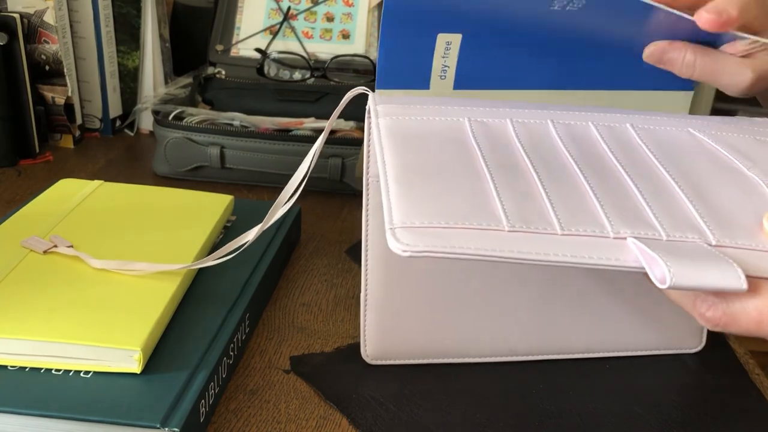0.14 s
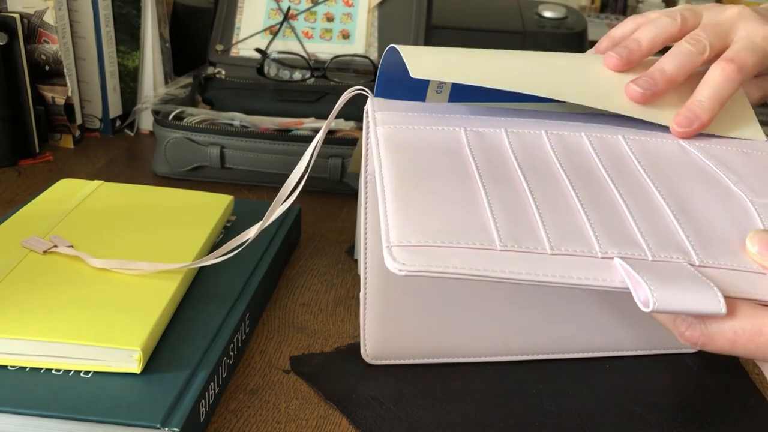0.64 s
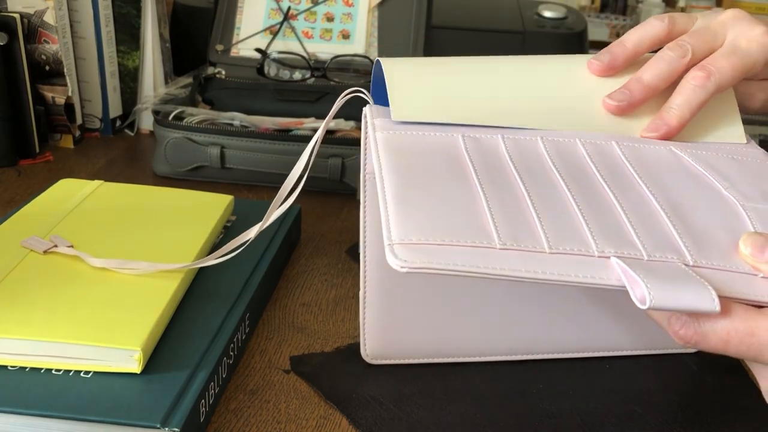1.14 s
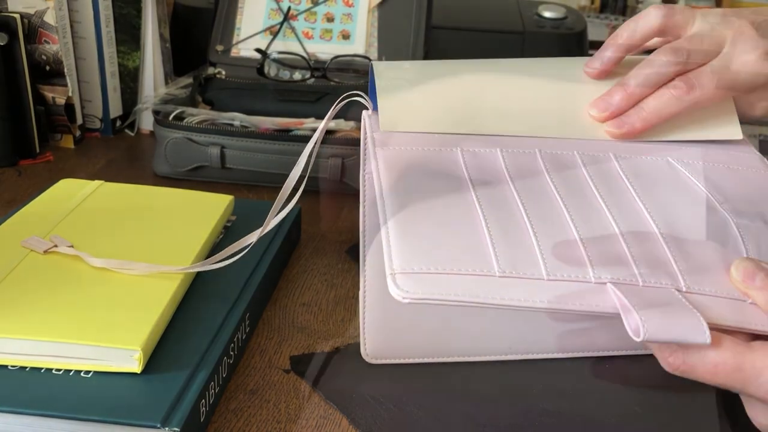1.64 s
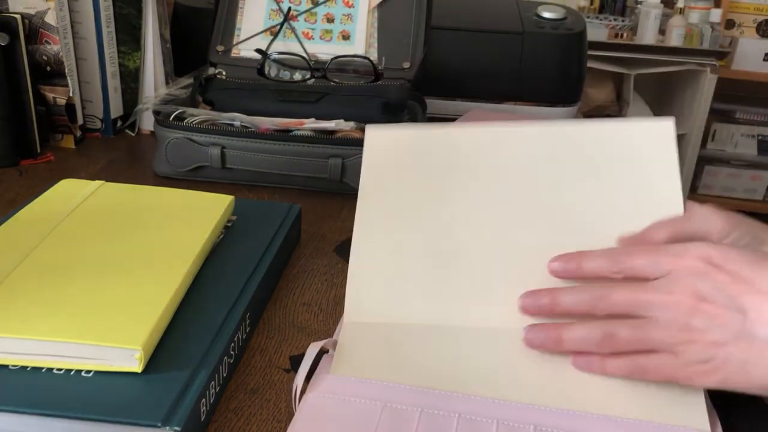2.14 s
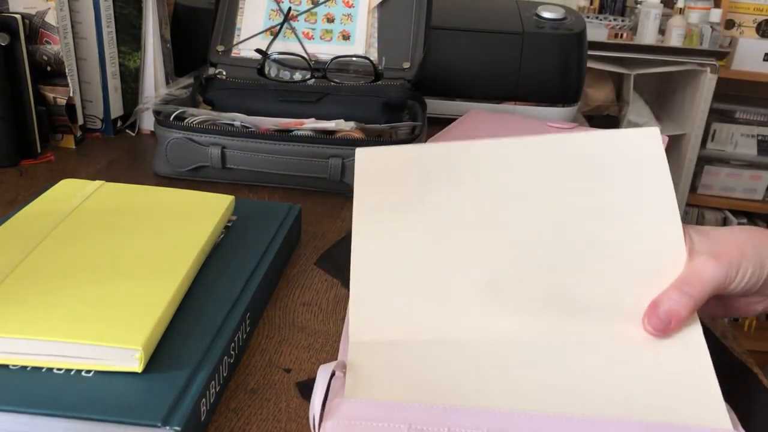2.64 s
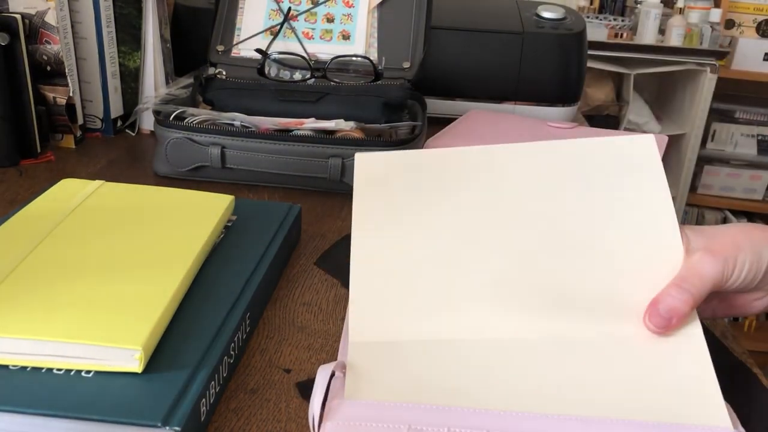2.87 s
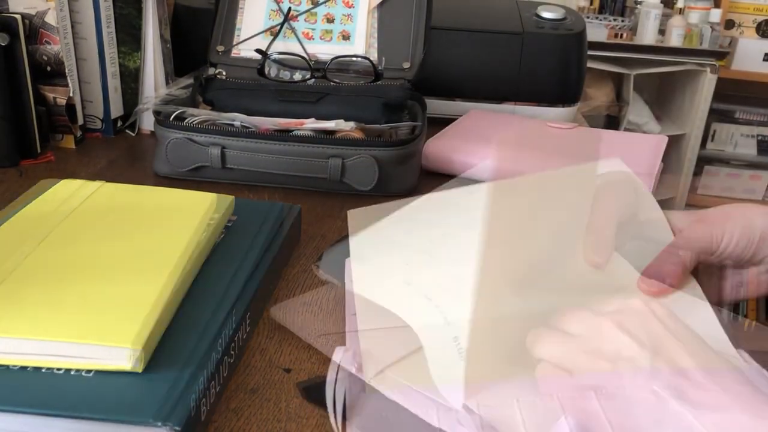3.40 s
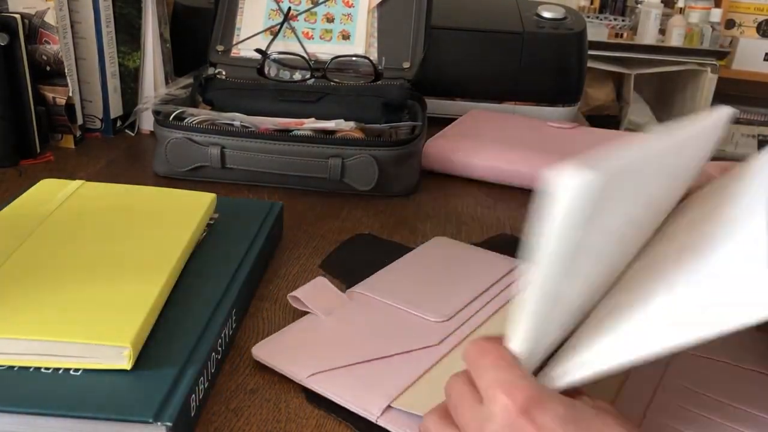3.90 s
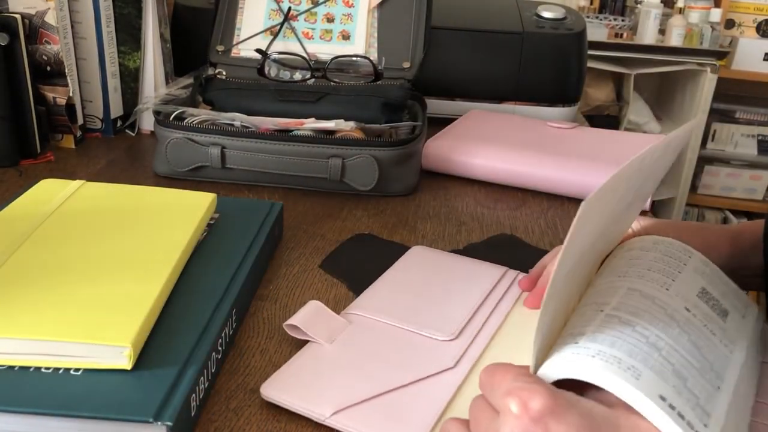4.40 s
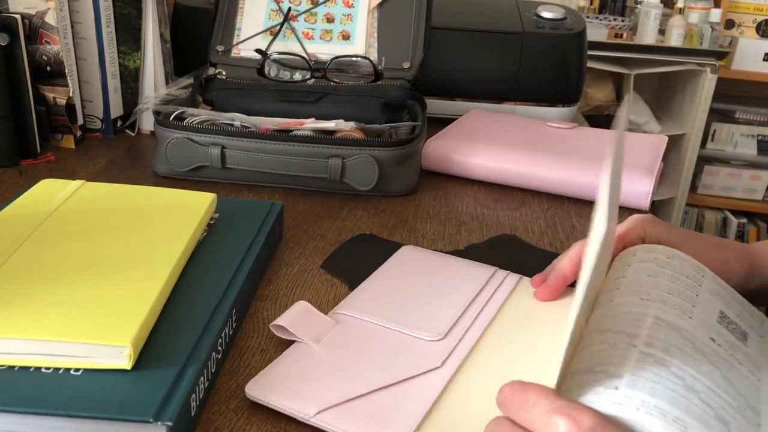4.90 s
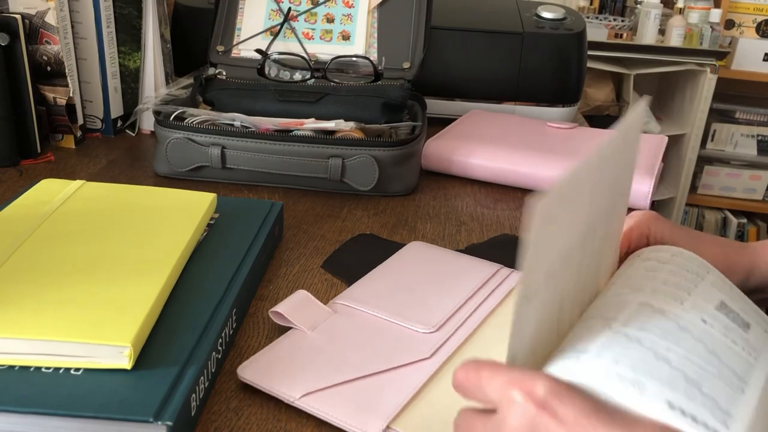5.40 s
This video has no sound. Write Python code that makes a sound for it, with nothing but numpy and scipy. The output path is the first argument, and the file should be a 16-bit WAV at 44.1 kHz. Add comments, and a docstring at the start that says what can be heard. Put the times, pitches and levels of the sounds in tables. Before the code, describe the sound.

Paper sheets and a soft plastic notebook cover rustle and scrape at a desk, with crisp creases, hollow pops and small bumps.

```python
"""Sheets rub and hiss as a notebook's card cover slides into the pocket of a soft plastic folder.
Stick-slip noise excites desk, pocket and paper; creases snap as damped bursts; trapped air pops as
gliding, dying sines with a rattle; the folder bumps the wooden desk as a falling front and ringing modes.
Rubs sing briefly on one resonance and wide sheets fan low air at the microphone of a close phone.
A small furnished room answers with decaying noise, over a faint hum of air made of filtered noise."""
import sys
import numpy as np
from scipy import signal
from scipy.fft import rfft, irfft, next_fast_len
from scipy.io import wavfile
from scipy.ndimage import uniform_filter1d, map_coordinates

SR = 44100
rng = np.random.default_rng(int(sys.argv[2]) if len(sys.argv) > 2 else 0)


def wav_out(sig):
    """Save sig, one row per channel (or a flat mono array), as 16-bit PCM at SR to the path in sys.argv[1]."""
    wavfile.write(sys.argv[1], SR, np.round(np.clip(np.atleast_2d(sig).T, -1, 1) * 32767).astype(np.int16))


def volts(x):
    """Linear amplitude factor 10**(x/20) for a level x in dB, scalar or array-like."""
    e = np.asarray(x, float) / 20
    return 10 ** e


N = 243557

# mean rubbing, before hand and strokes: (time [s], drag on the desk [dB], card in the pocket [dB])
RUBBING_LEVELS = [(0.0, -60, -64.5), (0.28, -63, -64.5), (0.49, -64, -65.5), (0.81, -62.5, -63),
                  (1.25, -63, -63.5), (1.42, -66, -62.5), (1.66, -67, -62), (1.695, -73, -43),
                  (1.76, -72, -63.5), (1.99, -61, -62.5), (2.1, -61, -63.5), (2.35, -61.5, -67),
                  (2.61, -60, -64.5), (3.01, -56.5, -62), (3.15, -61, -68.5), (3.3, -68, -70),
                  (3.42, -63, -66.5), (3.78, -62.5, -65), (4.0, -59.5, -66.5), (4.29, -64, -59),
                  (4.67, -58, -70), (4.92, -59.5, -61), (5.16, -59, -65.5), (5.52, -69, -67.5)]
# sheets resting and creeping on each other between strokes: (time [s], scrape level [dB])
CREEP_LEVELS = [(0.0, -80), (0.26, -75.5), (0.32, -69.5), (0.75, -67), (0.88, -75.5), (1.05, -69),
                (1.25, -65.5), (1.41, -73.5), (1.8, -69.5), (2.0, -81), (2.55, -65.5), (2.76, -76.5),
                (3.2, -65.5), (3.4, -93), (3.6, -71), (4.2, -70), (4.65, -68), (5.25, -75.5), (5.52, -58)]
# strokes of sheet on sheet: (peak time [s], rise [s], fall [s], coarse scrape [dB], fine fizz [dB])
SHEET_STROKES = [(0.0, 0.032, 0.14, -65, -90), (0.506, 0.0054, 0.054, -62, -62.5),
                 (0.814, 0.02, 0.061, -63, -70), (0.925, 0.012, 0.13, -60, -69),
                 (1.3, 0.097, 0.1, -65.5, -63.5), (1.463, 0.032, 0.075, -62, -72),
                 (1.565, 0.018, 0.046, -57.5, -64), (1.604, 0.022, 0.032, -45.5, -54),
                 (1.93, 0.061, 0.086, -66, -73), (2.042, 0.047, 0.17, -61, -68.5),
                 (2.155, 0.004, 0.096, -60.5, -70), (2.283, 0.064, 0.1, -59, -67),
                 (2.35, 0.11, 0.16, -66.5, -60.5), (2.822, .003, 0.031, -55, -58),
                 (2.851, 0.032, 0.014, -61, -52.5), (2.955, 0.028, 0.091, -66.5, -62),
                 (3.055, 0.049, 0.034, -58, -54.5), (3.112, 0.047, 0.03, -52.5, -63),
                 (3.264, 0.016, 0.057, -55.5, -58), (3.329, 0.069, 0.044, -56.5, -67),
                 (3.488, 0.17, 0.27, -64.5, -70.5), (3.656, 0.039, 0.053, -60, -64),
                 (3.705, 0.026, 0.083, -65.5, -60), (3.803, 0.09, 0.14, -63.5, -59),
                 (4.02, 0.12, 0.045, -59, -72), (4.075, 0.044, 0.076, -59.5, -61),
                 (4.129, 0.051, 0.13, -57, -58), (4.278, 0.079, 0.072, -66.5, -68),
                 (4.381, 0.04, 0.035, -59.5, -56), (4.538, 0.0094, 0.049, -43.5, -50),
                 (4.77, 0.044, 0.35, -62, -63), (4.869, 0.17, 0.11, -63, -58.5),
                 (5.43, 0.035, 0.24, -60.5, -61), (5.52, 0.16, 0.29, -63, -52)]
# resonances of the rubbed desk: (frequency [Hz], width [Hz], level [dB])
DRAG_RESONANCES = [(102, 49, -4), (189, 12.2, 5), (275, 48, -1), (331.6, 20.7, 2.5), (404, 120, -6.5)]
# resonances of the hollow pocket: (frequency [Hz], width [Hz], level [dB])
POCKET_RESONANCES = [(538, 137, 3.5), (840, 272, 7), (1100, 410, 6.5), (1680, 690, -12)]
# relative spectrum of rubbed paper: (frequency [Hz], density [dB per Hz])
PAPER_SPECTRUM = [(880, -35), (1500, 4), (2630, 2), (3810, 0.5), (6620, 0), (7850, -1.5), (14800, -8.5),
                  (16000, -7), (16500, -68)]
# creases snapping, before radiation: (time [s], peak [dB], centre [Hz], edge relative to body [dB])
CREASE_SNAPS = [(0.297, -42, 4570, -5), (0.626, -43.5, 3400, -15), (1.342, -43, 4500, -8),
                (1.4562, -39.5, 2940, 0.5), (1.593, -35, 6200, -17), (1.6024, -21.5, 5400, -17),
                (2.0148, -39, 4620, -3), (2.1537, -49, 4430, -5), (2.187, -37, 2530, 4),
                (2.274, -28.5, 8000, -3.5), (2.28, -36, 2770, 0), (2.443, -27, 5970, -34),
                (2.5252, -36, 2000, -10), (2.82, -31, 4800, -6), (2.92, -40, 5850, -27),
                (2.947, -45, 5030, -12), (2.96, -36, 6100, -22), (2.9629, -27, 7000, -26),
                (2.9679, -33.5, 6600, -30), (3.023, -41.5, 2590, -10), (3.07, -36, 2520, -12),
                (3.102, -28.5, 5730, -2), (3.108, -32.5, 5450, -24), (3.254, -15, 4900, -36),
                (3.3147, -27, 3560, -11), (3.46, -33, 3140, -11), (3.473, -35, 3130, -21),
                (3.493, -34.5, 2840, -24), (3.5258, -43, 5000, -11), (3.55, -34, 4160, -7.5),
                (3.629, -35.5, 5630, -2.5), (3.6416, -36, 5800, -13), (3.648, -37, 3500, -2),
                (3.658, -43, 4500, -14), (3.732, -42, 4500, -15), (3.956, -40, 2440, -31),
                (3.986, -32, 2400, -14), (4.015, -31.5, 4820, -11), (4.257, -36, 3200, -7),
                (4.289, -39.5, 5700, -31), (4.296, -43, 7300, -16), (4.348, -45, 7500, -10),
                (4.371, -41, 8500, -8), (4.3775, -41, 7000, -15), (4.386, -36, 8500, -10),
                (4.3905, -42, 7000, -13), (4.4462, -38, 3180, -18), (4.456, -41, 6530, -3),
                (4.533, -23.5, 6340, -20), (4.616, -36.5, 2880, -7), (4.815, -28.5, 3520, -1.5),
                (4.96, -33, 2950, 1), (4.9925, -41.5, 4680, -42), (5.0536, -41, 4940, -25),
                (5.3937, -35, 5200, -0.5), (5.45, -33, 4140, -20), (5.515, -31, 3000, -14)]
# the pocket popping, before radiation: (time [s], peak [dB], air resonance [Hz])
POCKET_POPS = [(0.454, -47.5, 810), (0.599, -41, 820), (0.624, -45, 740), (1.01, -51, 770),
               (1.141, -46.5, 1210), (1.239, -45, 1170), (1.2455, -38.5, 1040), (1.342, -45, 1150),
               (1.455, -37.5, 1240), (1.561, -46, 1100), (1.593, -32, 1020), (1.602, -21, 1680),
               (1.603, -18, 1077), (1.684, -39, 1050), (1.793, -44, 1030), (2.015, -38.5, 944),
               (2.116, -44.5, 900), (2.154, -43, 1250), (2.19, -39, 890), (2.195, -43, 1250),
               (2.274, -40, 960), (2.2945, -43, 960), (2.355, -39.5, 1150), (2.363, -45, 1010),
               (2.372, -40, 1100), (2.435, -37.5, 840), (2.444, -28.5, 807), (2.5255, -38, 1500),
               (2.962, -44, 1170), (3.101, -36.5, 1080), (3.255, -38.5, 1440), (3.314, -47, 1030),
               (3.375, -45, 1230), (3.461, -46, 1290), (3.546, -44, 790), (3.621, -41, 1250),
               (3.956, -43, 800), (3.982, -41.5, 850), (4.014, -34.5, 964), (4.087, -42, 900),
               (4.135, -42.5, 930), (4.256, -41, 1100), (4.445, -35.5, 900), (4.532, -31, 1834),
               (4.533, -16, 874), (4.961, -42, 1080), (4.994, -40, 840), (5.032, -42, 933),
               (5.055, -41.5, 800), (5.064, -43.5, 840), (5.452, -42, 900), (5.473, -43, 720),
               (5.516, -41, 1560)]
# bumps on the desk: (time [s], peak of the front [dB], softness [ms], thud [Hz])
DESK_BUMPS = [(.318, -58, 1.7, 197), (.746, -52.5, 1.4, 198), (1.247, -48.5, .6, 410),
              (1.457, -40, 1.9, 236), (1.602, -36.5, 0.55, 330), (2.016, -43, 0.72, 434),
              (2.111, -51, 2.2, 310), (2.295, -36.5, 0.95, 310), (2.306, -44, 1, 280),
              (2.355, -44, 0.72, 397), (2.4357, -33, 1, 293), (2.445, -30.5, 0.28, 320),
              (2.526, -33, 2.1, 304), (2.824, -40.5, 3.3, 280), (2.831, -41.5, 4, 160),
              (2.856, -40, 0.85, 345), (3.096, -42, 9.5, 216), (4.014, -46, 0.75, 310),
              (4.532, -46, 2, 295), (4.553, -40, 0.83, 300), (4.72, -47, 1.1, 307), (4.831, -46.5, .5, 423),
              (5.47, -47.5, 0.4, 358)]
# mean modes of the struck desk: (frequency [Hz], relative level [dB], nominal t60 [s])
DESK_MODES = [(111, -3.5, 0.13), (171.7, 9, 0.075), (205.2, 7, 0.14), (280, 17.5, 0.016), (347, 6.5, 0.086),
              (466, 7.5, 0.088), (538, 3.5, 0.2), (820, 1, 0.099)]
# rubs that sing: (middle time [s], length [s], mean rms level [dB], frequency [Hz], pitch spread [Hz])
SINGING_RUBS = [(1.098, 0.24, -69, 2040, 190), (2.934, 0.2, -59, 335, 6.7), (3.606, 0.16, -65, 339, 11.3),
                (4.31, 0.17, -61.5, 337, 14.6), (4.922, 0.32, -58.5, 333.7, 12)]
# wide sheets fanning air at the microphone: (time [s], peak [dB], frequency [Hz])
SHEET_FANS = [(2.86, -71, 52), (3.099, -49, 55), (4.542, -53, 62)]
# reverberation of the room: (frequency [Hz], t60 [s])
ROOM_DECAY = [(150, 0.46), (1000, 0.24), (4000, 0.17), (12000, 0.15)]
# relative spectrum of ventilation and hiss: (frequency [Hz], density [dB per Hz])
AIR_SPECTRUM = [(15, -65), (25, 6), (80, -1), (182, 11.5), (238, 2.5), (304, 6), (617, -15), (952, -13),
                (1830, -21), (3810, -39), (4360, -26), (14800, -67), (16500, -86)]

CREEP_FIZZ_DB = -8  # fine fizz of the creep, relative to its scrape
STROKE_FADE_DB = 20  # lost over one rise or one fall
CARD_FOLLOWS, DRAG_FOLLOWS = 0.7, 0.23  # power of the scrape's gain that also swells card and drag
POP_T60_S = 0.016  # decay of a pop's main resonance
RATTLE_DB, RATTLE_T60_S = -20.5, 0.18  # the card rattles on: peak relative to the pop, decay
SMALL_POP_DB, SMALL_POP_HZ = 5, 1050  # chance pops: greatest peak over capped card level, central pitch
FRONT_HZ, FRONT_S, FRONT_T60_S = 900, 0.00097, 0.025  # front: initial excess pitch, glide time, decay
RING_DB = -4.5  # peak of the desk's ring relative to the front
AIR_DB = -67  # rms level of the air at the microphone


def rubbing():
    """Stick-slip friction: grit excites desk, pocket and sheet; one unsteady hand shakes all three."""
    drag_db, card_db = curves(RUBBING_LEVELS)
    scrape_gain, fizz_gain = sliding()
    hand_db = 1.97 * wobble(45)
    drag = unit(filtered(gritty(grit_db=-0.5), resonant(DRAG_RESONANCES)))
    card = unit(filtered(gritty(grit_db=5.0), resonant(POCKET_RESONANCES)))

    contact = patchy(gritty(grit_db=2.5), patchy_db=2.5)
    sheet = filtered(contact, lambda hz: volts(along(PAPER_SPECTRUM, hz)))
    fizz = filtered(sheet, lambda hz: 1 / (1 + (6500 / (hz + 1)) ** 4))  # the part above 6.5 kHz
    scrape = unit(sheet - fizz) + 0.6 * crackle(count=2200)
    hiss = fizz_gain * unit(fizz) + scrape_gain * scrape

    stroke = scrape_gain / np.median(scrape_gain)
    drag = drag * stroke ** DRAG_FOLLOWS
    card = card * stroke ** CARD_FOLLOWS
    drag_gain = volts(drag_db + 0.68 * hand_db + 2.15 * wobble(20))
    card_gain = volts(card_db + hand_db + 2.3 * wobble(23.795))
    return drag_gain * drag + card_gain * card + volts(0.31 * hand_db) * hiss


def sliding():
    """Power addition: scrape and fizz gains sum a creeping bed and strokes that swell and fade evenly in dB."""
    creep_db, = curves(CREEP_LEVELS)
    t = np.arange(N) / SR
    power = volts([creep_db, creep_db + CREEP_FIZZ_DB]) ** 2
    for s, rise, fall, *levels_db in SHEET_STROKES:
        shape_db = -STROKE_FADE_DB * np.maximum((s - t) / rise, (t - s) / fall)
        power = power + volts(np.add.outer(levels_db, shape_db)) ** 2
    return np.sqrt(power)


def gritty(grit_db):
    """Stick-slip noise: white noise of rms 1 whose slips differ in size."""
    slips = unit(uniform_filter1d(rng.standard_normal(N), size=24))
    return unit(rng.standard_normal(N) * volts(grit_db * np.clip(slips, -3, 2)))


def patchy(x, patchy_db):
    """Distributed contact: different parts of the sheet touch in turn, so the colour shifts in patches."""
    z = signal.stft(x, nperseg=256)[2]
    field = uniform_filter1d(rng.standard_normal(z.shape), size=12, axis=0)  # smooth over frequency
    field = uniform_filter1d(field, size=10, axis=1)  # smooth over time
    return signal.istft(z * volts(patchy_db * unit(field)), nperseg=256)[1][:N]


def crackle(count):
    """Impulsive noise: tiny creases as short damped grains of random pitch, a few much larger; rms 1."""
    place, pitch, size = rng.random((count, 3)).T
    t = np.arange(SR // 300) / SR
    hz = (1500 * 6 ** pitch)[:, None]
    gain = volts(-3.9 * np.log(size + 0.01))[:, None]
    grains = gain * ring(t, hz, 6 / hz)
    at = (place * N).astype(int)[:, None] + np.arange(len(t))
    return unit(np.bincount(at.ravel(), grains.ravel(), N)[:N])


def singing():
    """Frictional lock-in: a rub holds one resonance, a tone of shivering pitch that swells in and out."""
    t = np.arange(N) / SR
    out = np.zeros(N)
    for s, length, db, hz, width in SINGING_RUBS:
        swell = np.exp(-(2 * (t - s) / length) ** 4)
        level = volts(db + 2.5 * wobble(30))
        cycles = np.cumsum(hz + width * wobble(2 * width)) / SR
        out += level * swell * np.sqrt(2) * np.sin(2 * np.pi * cycles)
    return out


def snaps():
    """Buckling: a crease flips in a few quick jerks, a broad thwack of stiff sheet with a sharp edge."""
    out, t = np.zeros(N + SR), np.arange(SR // 50) / SR
    for s, db, hz, edge_db in CREASE_SNAPS:
        jerks = rng.standard_normal(len(t)) * volts(-60 * t / 0.0065)
        jerks[0] = 4  # the first flip, set strong
        sheet = ring(t[:SR // 400], hz, 3.94 / hz)  # heavily damped: 60 dB in 3.94 cycles
        body = np.convolve(jerks, sheet)[:len(t)]
        edge = np.diff(jerks, prepend=0)
        add(out, s, unit(body) + volts(edge_db) * unit(edge), db)
    return out[:N]


def pops():
    """Cavity resonance with dispersion: expelled air rings, high bend first, and the card rattles on."""
    out, t = np.zeros(N + SR), np.arange(SR // 10) / SR
    for s, db, hz in [*POCKET_POPS, *small_pops(count=40)]:
        bent = t + 0.00064 * (1 - np.exp(-t / 0.00054))  # time runs fast at first: a falling pitch
        low = volts(rng.normal(-1.5, 2.1)) * ring(bent, 0.567 * hz, 0.62 * POP_T60_S)
        high = 0.074 * ring(bent, 1.9 * hz, 1.5 * POP_T60_S)
        pushed_air = ring(bent, hz, POP_T60_S) + low + high
        add(out, s, pushed_air * (1 - np.exp(-t / 0.0013)), db)

        shakes = rng.standard_normal(len(t)) ** 3  # cubing makes them sparse
        shakes = shakes * volts(-60 * t / RATTLE_T60_S) * (1 - np.exp(-t / 0.008))
        rattle = np.convolve(shakes, ring(t[:SR // 200], hz, 2.5 / hz))[:len(t)]
        add(out, s, rattle, db + RATTLE_DB)
    return out[:N]


def small_pops(count):
    """Random excitation: rows of chance pops whose peaks follow the push on the card up to a cap."""
    place, size, pitch = rng.random((count, 3)).T
    card_db = curves(RUBBING_LEVELS)[1][(place * N).astype(int)]
    peak_db = np.minimum(card_db, -60) + SMALL_POP_DB - 8 * size
    return np.transpose([place * N / SR, peak_db, SMALL_POP_HZ * 1.6 ** (pitch - 0.5)])


def bumps():
    """Modal excitation and dispersion: high bending waves lead as a falling front, low modes swell later."""
    out, t = np.zeros(N + SR), np.arange(SR // 3) / SR
    for s, db, soft_ms, thud_hz in DESK_BUMPS:
        wood = np.zeros(len(t))
        scatter = rng.normal(0, 2.5, len(DESK_MODES))  # shifts each mode in dB and in percent of pitch
        for (hz, level_db, t60), d in zip(DESK_MODES, scatter):
            strength = volts(level_db + d) / (1 + (hz * soft_ms / 500) ** 2)  # soft pushes spare high modes
            wood += strength * ring(t, hz * (1 + d / 100), t60) * (1 - np.exp(-t * hz / 1.84))
        cycles = thud_hz * t + FRONT_HZ * FRONT_S * (1 - np.exp(-t / FRONT_S))
        front = np.sin(2 * np.pi * cycles) * volts(-60 * t / FRONT_T60_S)
        front = front * (1 - np.exp(-t / 0.0014)) ** 2
        add(out, s, front, db)
        add(out, s, wood * (1 + volts(-60 * t / 0.2)), db + RING_DB)  # a faster early decay
    return out[:N]


def fans():
    """Air displacement: a wide sheet gives a soft low push, a slowly rising damped sine."""
    out, t = np.zeros(N + SR), np.arange(SR // 4) / SR
    for s, db, hz in SHEET_FANS:
        add(out, s, ring(t, hz, 0.1) * (1 - np.exp(-t / 0.021)) ** 2, db)
    return out[:N]


def room(x):
    """Reverberation: decaying noise after the nearest wall's delay; moving hands renew the pattern."""
    out, step = np.zeros(N + 2 * SR), SR // 5
    for at in range(0, N, step):  # a new pattern every 0.2 s
        hz, t, z = signal.stft(rng.standard_normal(SR // 3), SR, nperseg=256)
        decay = volts(-60 * t / along(ROOM_DECAY, hz)[:, None])
        tail = signal.istft(z * decay, SR, nperseg=256)[1]
        wet = signal.fftconvolve(x[at:at + step], tail / np.linalg.norm(tail))
        out[at + round(0.007 * SR):][:len(wet)] += wet
    return out[:N]


def air():
    """Stationary noise: steady ventilation and microphone hiss, shaped by one spectrum."""
    noise = filtered(rng.standard_normal(N), lambda hz: volts(along(AIR_SPECTRUM, hz)))
    return volts(AIR_DB) * unit(noise)


def unit(x):
    """Normalization to rms 1."""
    return x / np.sqrt(np.mean(x ** 2) + 1e-20)


def along(points, hz):
    """Interpolation of (frequency [Hz], value) points on a logarithmic frequency axis."""
    f, v = np.transpose(points)
    return np.interp(np.log(hz + 1), np.log(f + 1), v)


def curves(rows):
    """Linear interpolation: one value per sample for each column after the time."""
    s, *cols = np.transpose(rows)
    return [np.interp(np.arange(N) / SR, s, c) for c in cols]


def wobble(rate):
    """Band-limited fluctuation: a smooth random curve with rate knots a second."""
    knots = rng.standard_normal(int(N * rate / SR) + 4)
    return map_coordinates(knots, [np.arange(N) * rate / SR])


def filtered(x, response):
    """Linear filtering: the spectrum of x times a complex response of frequency."""
    m = next_fast_len(N + SR // 2)
    return irfft(rfft(x, m) * response(np.fft.rfftfreq(m, 1 / SR)), m)[:N]


def resonant(modes):
    """Modal superposition: causal response of a few resonances with alternating signs."""
    def response(f):
        total = 0
        for k, (centre, width, db) in enumerate(modes):
            damping = 1j * f * width
            total = total + (-1) ** k * volts(db) * damping / (centre * centre - f * f + damping)
        return total
    return response


def ring(t, hz, t60):
    """Free damped oscillation: a sine that loses 60 dB in t60 seconds."""
    return volts(-60 * t / t60) * np.sin(2 * np.pi * hz * t)


def add(out, s, sound, db):
    """Linear superposition: place a sound at s seconds with the given peak level."""
    out[round(s * SR):][:len(sound)] += volts(db) * sound / np.abs(sound).max()


def scene():
    """Direct and reverberant field at one microphone: snaps and knocks ring in the room, rubbing much less."""
    ticks = filtered(snaps(), lambda hz: (1j * hz / (700 + 1j * hz)) ** 2)  # a thin sheet radiates no bass
    knocks = filtered(pops(), lambda hz: 1j * hz / (250 + 1j * hz)) + bumps()
    rub = rubbing() + singing()
    reflected = room(volts(-13.5) * ticks + volts(-12.5) * knocks + volts(-19.5) * rub)
    return (rub + ticks + knocks + fans() + reflected + air())[None]


def band_limit(x):
    """A steep low-pass at the top of the band."""
    return signal.sosfilt(signal.butter(12, 16800, fs=SR, output="sos"), x)


def record(dry):
    """Transducer band limits: the small microphone loses the deep bass and the top."""
    heard = filtered(dry[0], lambda hz: (1j * hz / (42 + 1j * hz)) ** 3 / (1 + (hz / 16200) ** 30))
    return band_limit(heard[None])


dry = scene()
out = record(dry)
wav_out(out)
```